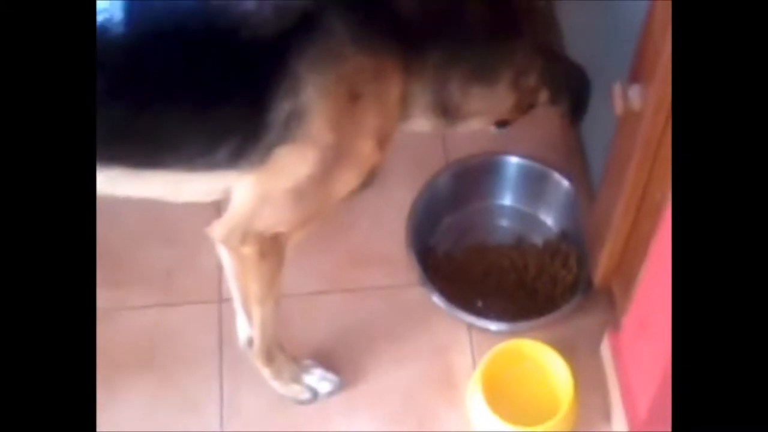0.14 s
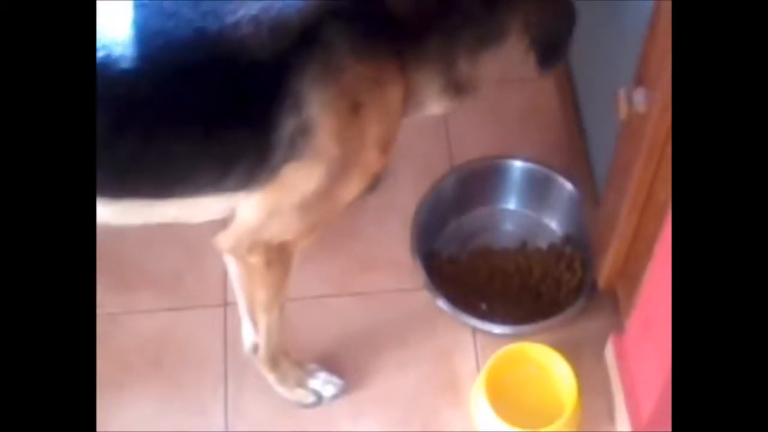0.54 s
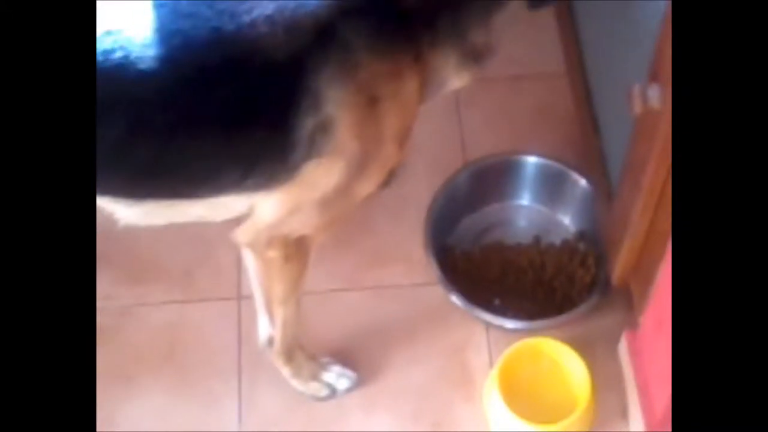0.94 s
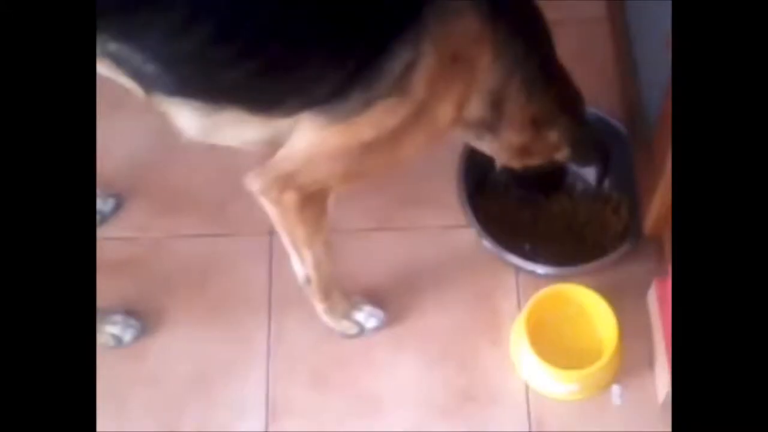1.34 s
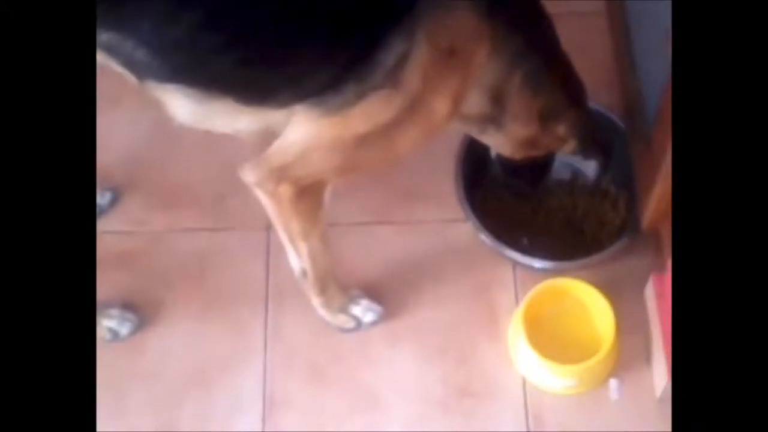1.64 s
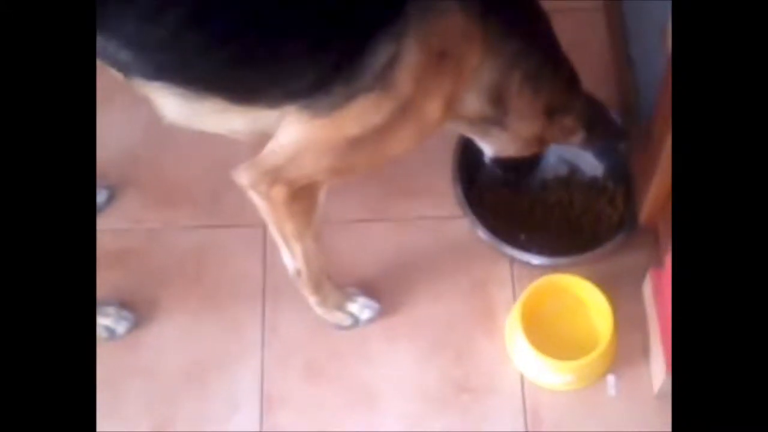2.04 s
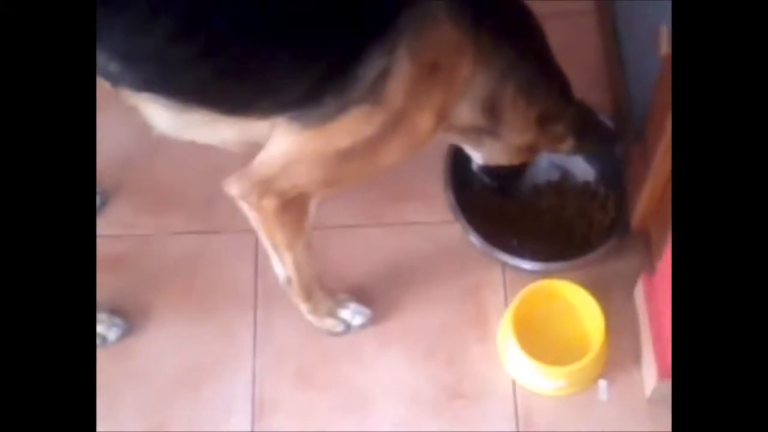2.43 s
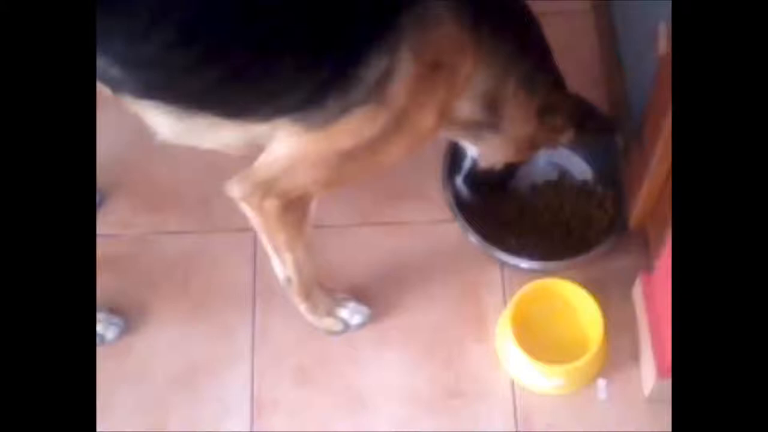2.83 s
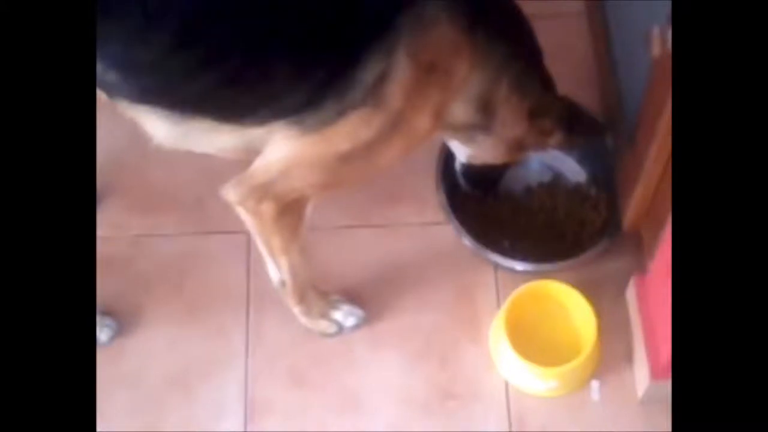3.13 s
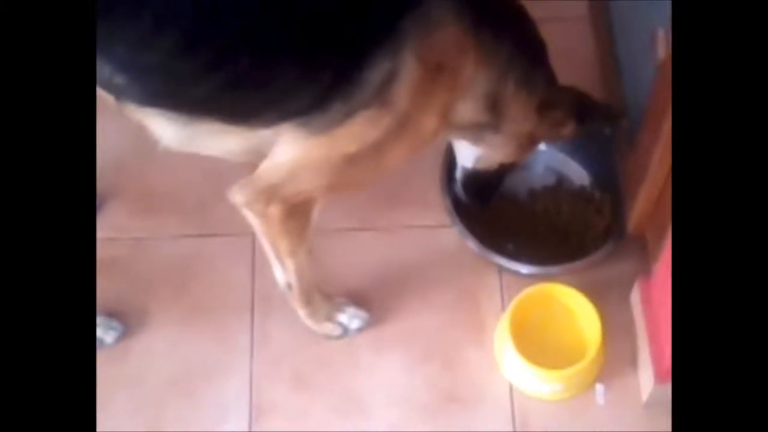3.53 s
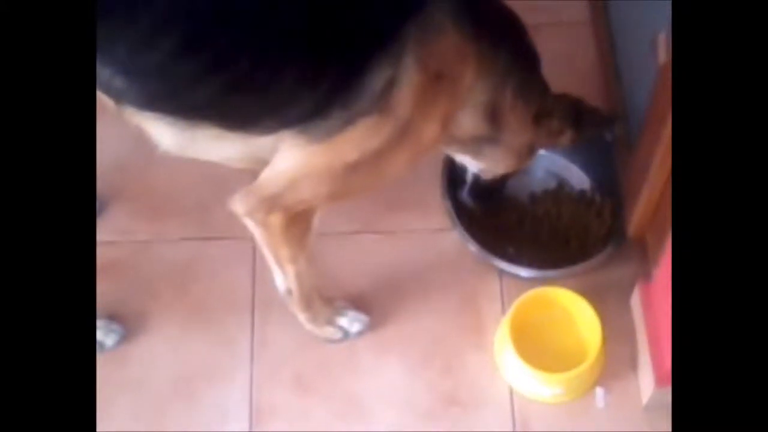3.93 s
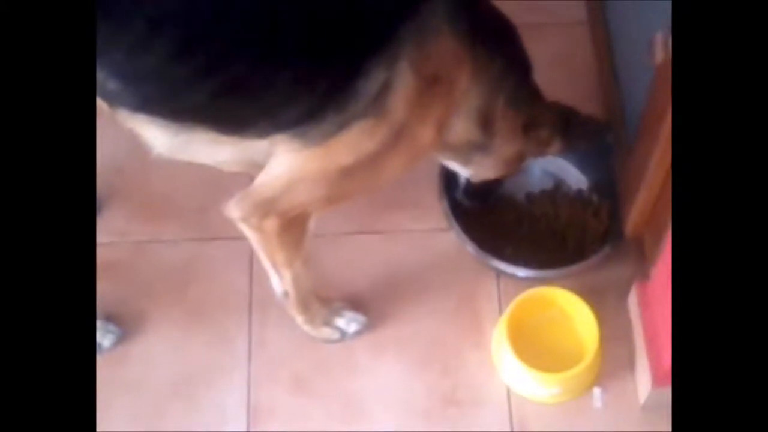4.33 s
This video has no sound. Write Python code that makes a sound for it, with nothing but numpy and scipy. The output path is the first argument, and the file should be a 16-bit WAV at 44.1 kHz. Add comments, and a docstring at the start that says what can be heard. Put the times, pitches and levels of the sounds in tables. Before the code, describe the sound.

Close-up mono sound of a dog chewing pellets: brittle cracks, hollow mouth pops, soft wet smacks and fine grinding in uneven bursts. About a third of the way through, the steel bowl gets one sharp, short knock that distorts the microphone. The heaviest crunching follows, then sparser bites. Hard tiles reflect everything over low, steady background noise.

```python
"""In a bare tiled kitchen a dog crunches dry kibble over a steel bowl.
Pellets crack between its teeth in uneven bursts, built from runs of tiny coloured fractures.
The mouth pops, squelches, thuds and rings low as gliding resonances; rubs and crumbs are coloured grains.
One hard clink on the bowl, a choked sine with a short broad clatter, overloads the small microphone.
A tail of sparse reflections rings after every bite, over a steady floor of coloured noise."""
import sys
import numpy as np
from scipy import signal
from scipy.fft import rfft, irfft, next_fast_len
from scipy.io import wavfile

SR = 44100
rng = np.random.default_rng(int(sys.argv[2]) if len(sys.argv) > 2 else 0)


def materialize(psi):
    """Save the field psi as 16-bit PCM at rate SR to the path in sys.argv[1].

    A 1-D psi becomes a single channel; in a 2-D psi each row is a channel.
    """
    bounded = np.clip(np.atleast_2d(psi).T, -1, 1)
    quanta = np.round(bounded * 32767).astype(np.int16)
    wavfile.write(sys.argv[1], SR, quanta)


N = 197171
TIME = np.arange(N) / SR


def from_db(db):
    """Turns decibels into an amplitude factor."""
    return 10 ** (np.asarray(db) / 20)


def rms_one(x):
    """Scales a sound to an RMS of 1."""
    return x / np.sqrt(np.mean(x ** 2) + 1e-20)


def at_hz(points, hz):
    """Reads a curve of (Hz, value) points along a logarithmic frequency axis."""
    known_hz, values = np.transpose(points)
    return np.interp(np.log(np.maximum(hz, 1)), np.log(known_hz), values)


def add(out, s, sound):
    """Lays a sound into the track at time s."""
    start = max(round(s * SR), 0)
    out[start:start + len(sound)] += sound[:N - start]


def colour(x, spectrum):
    """Minimum-phase filter with the given spectrum: nothing sounds early."""
    size = 2 * next_fast_len(len(x))
    hz = np.arange(size // 2 + 1) * SR / size
    # below its first point the spectrum rolls off towards the bass
    below = np.minimum(1, (hz + 10) / spectrum[0][0])
    cepstrum = irfft(np.log(from_db(at_hz(spectrum, hz)) * below))
    # folding the cepstrum forward in time gives the minimum phase
    cepstrum[1:size // 2] *= 2
    cepstrum[size // 2 + 1:] = 0
    response = np.exp(rfft(cepstrum))
    return irfft(rfft(x, size) * response)[:len(x)]


def grains(size, per_s, spread_db):
    """Tiny fractures at random moments, of random sign and very uneven strength."""
    strength = from_db(spread_db * np.minimum(rng.exponential(1, size), 4))
    happens = rng.random(size) < per_s / SR
    return happens * strength * rng.choice([-1, 1], size)


def ring(hz, t60):
    """A struck mode: a sine under an exponential decay that starts at 1."""
    t = TIME[:SR // 2]
    return np.sin(2 * np.pi * hz * t) * from_db(-60 * t / t60)


def swell(t, length_s):
    """Rises quickly to 1 and fades out over its length."""
    return np.sin(np.pi * np.clip(t / length_s, 0, 1) ** .6)


# Colour of the steady background. Each row: frequency in Hz, relative density in dB per Hz.
FLOOR_COLOUR = [(15, -54), (25, -6), (66, -27), (104, -55), (155, -22), (238, -11.5), (301, -15),
                (391, -11.5), (545, -13.5), (796, -13.5), (2050, -13.5), (2540, -11), (3890, -18),
                (7210, -24.5), (9370, -56.5), (15900, -120)]


def background(level_db):
    """Steady random noise takes on the colour of the background."""
    return from_db(level_db) * rms_one(colour(rng.standard_normal(N), FLOOR_COLOUR))


# How long the kitchen rings. Each row: frequency in Hz, time to fall by 60 dB in seconds.
KITCHEN_T60 = [(200, 0.63), (530, 0.56), (1400, 0.34), (3700, 0.4), (7000, 0.14)]
# How strongly the kitchen echoes. Each row: frequency in Hz, relative level in dB.
KITCHEN_ECHO = [(200, 0), (480, -1.1), (750, 1), (2000, -0.31), (4000, -1.3), (7000, -1.8)]


def kitchen(x, gap_s, early_db, early_s):
    """Reflections off the tiles follow a short gap; the lows of their tail last longest."""
    t = TIME[:SR]
    walls = rms_one(grains(SR, per_s=4200, spread_db=1.0)) * np.clip((t - gap_s) / 0.0012, 0, 1)
    walls = walls * (1 + from_db(early_db) * np.exp(-t / early_s))   # extra early energy
    spectrum, hz = rfft(walls), np.arange(SR // 2 + 1)
    edges = np.geomspace(100, 9000, 13)
    echo = np.zeros(SR)
    for low, high in zip(edges, edges[1:]):
        centre = np.sqrt(low * high)
        band = irfft(spectrum * ((hz >= low) & (hz < high)))
        fading = band * from_db(-60 * t / at_hz(KITCHEN_T60, centre))
        # a wider band carries more power
        width = np.sqrt(2 * (high - low)) / SR
        echo += from_db(at_hz(KITCHEN_ECHO, centre)) * rms_one(fading) * width
    return signal.fftconvolve(x, echo)[:N]


# Grinding between the cracks, following the work of the jaw.
# Each row: time in seconds, relative mouth level in dB, relative crumb level in dB.
GRINDING = [(0.0, -37.5, -42), (0.2, -58.5, -53.5), (0.38, -61.5, -48), (0.5, -71, -50), (0.87, -46.5, -46),
            (1.11, -50.5, -47.5), (1.31, -54, -49), (1.59, -52.5, -51), (2.02, -38.5, -38.5),
            (2.17, -42.5, -56), (2.33, -54, -46.5), (2.61, -48.5, -44), (2.8, -46.5, -51),
            (3.2, -55.5, -55), (3.63, -64, -55.5), (4.05, -54.5, -47.5), (4.28, -54.5, -38.5),
            (4.47, -52, -46.5)]
# Colour of the wet mouth. Each row: frequency in Hz, relative level in dB.
MOUTH_COLOUR = [(150, -23.5), (300, -15.5), (550, -3), (780, 4.5), (1200, 1.5), (2000, -9.5), (3200, -19.5)]
# Colour of the dry crumbs. Each row: frequency in Hz, relative level in dB.
CRUMB_COLOUR = [(1200, -6), (2400, 1.5), (3500, -8), (5000, -12), (6800, -5), (7600, -8.5)]


def grinding(mouth_db, crumbs_db):
    """Wet smacking and fine crumbs under the teeth follow the work of the jaw."""
    s, *columns = np.transpose(GRINDING)
    mouth, crumbs = [from_db(np.interp(TIME, s, column)) for column in columns]
    smacking = rms_one(colour(grains(N, per_s=410, spread_db=3.5), MOUTH_COLOUR))
    grit = rms_one(colour(grains(N, per_s=900, spread_db=5.0), CRUMB_COLOUR))
    return from_db(mouth_db) * mouth * smacking + from_db(crumbs_db) * crumbs * grit


# Soft rubs of tongue and muzzle over the pellets.
# Each row: start in seconds, length in seconds, level in dB.
SOFT_RUBS = [(0.84, 0.032, -52), (0.868, 0.032, -35), (1.147, 0.041, -35.5), (2.512, 0.037, -30.5),
             (3.829, 0.054, -38.5)]
# Colour of a rub. Each row: frequency in Hz, relative level in dB.
RUB_COLOUR = [(500, -14), (1000, -2), (1900, -0.5), (3300, -7), (4300, -4), (5300, -9), (6800, -3.5)]


def rubs():
    """Countless small slips merge into a short swish."""
    out, t = np.zeros(N), TIME[:SR // 8]
    for s, length_s, db in SOFT_RUBS:
        slips = rms_one(colour(grains(len(t), per_s=1800, spread_db=4), RUB_COLOUR))
        add(out, s, from_db(db) * swell(t, length_s) * slips)
    return out


# Squelches, thuds and low ringing in the hollow of the mouth.
# Each row: start in seconds, length in seconds, start pitch in Hz, end pitch in Hz, relative level in dB.
HOLLOW_SOUNDS = [(0.327, 0.13, 1240, 804, -50), (0.492, 0.037, 399, 356, -40.5),
                 (.96, 0.11, 478.3, 455, -49.5), (.99, 0.16, 228, 255, -55), (2.228, .047, 383, 391, -32.5),
                 (2.301, 0.12, 365.6, 426, -48.5), (2.429, .087, 1212, 1262, -48.5),
                 (2.502, 0.096, 1095, 686, -47.5), (2.835, 0.19, 859, 932, -49),
                 (2.844, 0.077, 424, 447, -49), (2.898, .2, 245.7, 252, -56.5)]
HOLLOW_BREADTH = 7.8   # width in Hz times length in s: a short sound is broad, a long one narrow


def mouth_hollow(level_db):
    """Noise stirs a cavity resonance that slides in pitch: squelches, thuds and low ringing."""
    out, t = np.zeros(N), TIME[:SR // 3]
    for s, length_s, start_hz, end_hz, db in HOLLOW_SOUNDS:
        half_width_hz = np.clip(HOLLOW_BREADTH / length_s / 2, 15, 300)
        narrow = signal.butter(2, half_width_hz, fs=SR, output="sos")
        # the first half of the noise only settles the filter
        stir = signal.sosfilt(narrow, rng.standard_normal((2, 2 * len(t))))[:, len(t):]
        pitch_hz = np.interp(t, [0, length_s], [start_hz, end_hz])
        phase = 2 * np.pi * np.cumsum(pitch_hz) / SR
        envelope = swell(t, length_s)
        sound = envelope * (stir[0] * np.cos(phase) + stir[1] * np.sin(phase))
        loudness = from_db(db + level_db) * np.sqrt(np.mean(envelope ** 2))
        add(out, s, loudness * rms_one(sound))
    return signal.sosfilt(signal.butter(2, 170, "high", fs=SR, output="sos"), out + 1e-18)


CLINK_S = 1.5282   # moment of the knock on the steel
# The bowl's faint ring. Each row: pitch in Hz, relative level in dB, time to fall by 60 dB in seconds.
BOWL_RING = [(2090, -46.5, 0.24), (2290, -31.5, 0.3), (2310, -43, .28), (4940, -52.5, 0.24),
             (6900, -40.5, .24)]
# Colour of the knock's clatter. Each row: frequency in Hz, relative level in dB.
CLATTER_COLOUR = [(400, -5), (800, 1.5), (2200, 4), (4000, -4), (6000, 2.5), (6900, 6)]


def bowl(clatter_db, clatter_s, ring_db):
    """A short broad clatter as the steel is struck, and the bowl's faint ring."""
    out, t = np.zeros(N), TIME[:SR // 10]
    add(out, CLINK_S, sum(from_db(db + ring_db) * ring(hz, t60) for hz, db, t60 in BOWL_RING))
    clatter = rms_one(colour(grains(len(t), per_s=8400, spread_db=2), CLATTER_COLOUR))
    add(out, CLINK_S, from_db(clatter_db) * clatter * np.exp(-t / clatter_s))
    return out


def clink(pitch_hz, length_s, peak_db, touch_db, touch_hz, octave):
    """A light touch, then a hard knock on the steel that the muzzle chokes within a few milliseconds."""
    out, t = np.zeros(N), TIME[:SR // 20]
    attack = 1 - np.exp(-t / 0.0013)
    choke = attack * np.clip(1 - t / length_s, 0, 1)
    # the pitch climbs during the first cycles, as the contact stiffens
    climbing_hz = pitch_hz * (1 - 0.2 * np.exp(-t / 0.00071))
    knock = choke * np.sin(2 * np.pi * np.cumsum(climbing_hz) / SR)
    add(out, CLINK_S - .0013, from_db(touch_db) * ring(touch_hz, 0.066))
    # a one-sided contact swings unevenly, which adds the octave
    add(out, CLINK_S, from_db(peak_db) * (knock - octave * knock ** 2))
    return out


# Dry ticks right beside the microphone. Each row: start in seconds, relative level in dB.
DRY_TICKS = [(0.036, -11), (1.0129, -17)]


def ticks(snap_hz, after_hz):
    """A snap of a few cycles with a thin after-ring, too small to carry any bass."""
    out = np.zeros(N)
    tick = 2.1 * ring(snap_hz, 0.0014) + 0.13 * ring(after_hz, 0.0098)
    for s, db in DRY_TICKS:
        add(out, s, from_db(db) * tick)
    return signal.sosfilt(signal.butter(2, 1500, "high", fs=SR, output="sos"), out + 1e-18)


# Short pops of lips and tongue. Each row: start in seconds, pitch in Hz, relative peak in dB.
MOUTH_POPS = [(.059, 871, -20), (.471, 836, -19), (.5, 1635, -10.5), (.513, 875, -11), (.518, 1765, -7.5),
              (.548, 976, -17), (2.093, 717, -12.5), (2.141, 1535, -23), (2.191, 1232, -20),
              (2.627, 1977, -29.5), (2.695, 726, -21), (2.7, 1240, -28), (2.701, 1727, -13.5),
              (2.849, 754, -33.5)]
POP_CYCLES = 4.5   # every pop decays by a factor e over this many cycles


def pops(rise_s, glide, level_db):
    """The mouth cavity rings for a moment, its pitch lifting as the lips part."""
    out, t = np.zeros(N), TIME[:SR // 4]
    for s, hz, peak_db in MOUTH_POPS:
        fading = np.exp(-t * hz / POP_CYCLES)
        lifting_hz = hz * (1 + glide * (.5 - fading))
        phase = 2 * np.pi * np.cumsum(lifting_hz) / SR
        envelope = (1 - np.exp(-t / rise_s)) * fading
        add(out, s, from_db(peak_db + level_db) * envelope / envelope.max() * np.sin(phase))
    return out


def fragments(rows, delay_s, loss_db):
    """A cracked pellet gives way once more, weaker and at an uneven delay, as the jaw closes on it."""
    lateness = rng.uniform(-1, 1, len(rows))   # in octaves of the delay
    return [(s + delay_s * 2 ** late, strength_db - loss_db, hollow_db)
            for (s, strength_db, hollow_db), late in zip(rows, lateness)]


# Pellets cracking between the teeth. Each row: start in seconds, relative strength in dB, hollowness in dB
# (high deep in the closed mouth, low at the front teeth).
PELLET_CRACKS = [(0.059, -43, 5.5), (0.275, -55, -32), (.337, -48.5, -3.5), (0.4696, -35.5, 3.5),
                 (.494, -32, 7), (.513, -28, 3), (0.5477, -33, 1.5), (.651, -48, -20), (0.843, -46.5, -27),
                 (1.0, -48, -6), (1.007, -38.5, 3.5), (1.2256, -31, 4.5), (1.3, -43.5, -7),
                 (1.458, -43, -15), (1.7636, -30, -3), (1.8414, -34.5, 3.5), (1.853, -36.5, -23),
                 (1.984, -40.5, 0), (2.039, -44.5, 9.5), (2.058, -44, 3), (2.0895, -23.5, 1),
                 (2.1065, -32, 6.5), (2.1385, -28, 6), (2.187, -44, 14.5), (2.234, -26.5, 2.5),
                 (2.612, -53, -13), (2.6552, -35, 3), (2.688, -37.5, 12.5), (2.6942, -28, 11.5),
                 (2.85, -55, 17.5), (3.059, -49, -4), (3.112, -53.5, -5), (3.657, -44.5, -0.5),
                 (3.707, -48, -3.5), (3.921, -27, -13), (3.9519, -36.5, -27.5), (4.193, -48, -1),
                 (4.238, -40, -6.5), (4.279, -34, -8.5), (4.307, -34, -4.5), (4.42, -46, 1.5)]
# The jaw's part of a crack. Each row: frequency in Hz, relative level in dB.
JAW_COLOUR = [(100, -46), (300, -15.5), (520, -9.5), (740, 5), (950, -3.5), (1200, -1.5), (1700, -18.5),
              (3000, -29)]
# The pellet body's part of a crack. Each row: frequency in Hz, relative level in dB.
BODY_COLOUR = [(700, -22.5), (1250, -7), (1900, 2), (3100, -1.5), (4200, -7.5), (6500, -31.5)]
# The brittle edge's part of a crack. Each row: frequency in Hz, relative level in dB.
EDGE_COLOUR = [(2200, -20), (3700, -6.5), (5200, 3), (6800, 3), (7600, -4)]
MUFFLING = 0.23   # a closed mouth dulls the brittle edge: dB per dB of hollowness
# a crack stronger than the usual one splits the whole pellet: more body, less edge (dB per dB of strength)
USUAL_CRACK_DB, SPLITTING = -33.5, 0.1


def cracks(rows, decay_s, crumble_db, crumble_s, jaw_db, pellet_db, edge_db):
    """A pellet breaks in a quick run of fractures, then crumbles; jaw, body and edge each colour it."""
    out, t = np.zeros(N), TIME[:SR // 20]
    attack = 1 - np.exp(-t / 0.0003)
    envelope = attack * (np.exp(-t / decay_s) + from_db(crumble_db) * np.exp(-t / crumble_s))
    for s, strength_db, hollow_db in rows:
        split_db = SPLITTING * (strength_db - USUAL_CRACK_DB)
        parts = ((JAW_COLOUR, jaw_db + hollow_db),
                 (BODY_COLOUR, pellet_db + split_db),
                 (EDGE_COLOUR, edge_db - split_db - MUFFLING * hollow_db))
        for part_colour, part_db in parts:
            burst = colour(grains(len(t), per_s=9000, spread_db=2.5) * envelope, part_colour)
            # a level counts the burst's energy as spread over 5 ms
            power = np.sum(burst ** 2) / (.005 * SR)
            add(out, s, from_db(strength_db + part_db) * burst / np.sqrt(power + 1e-20))
    return out


# how strongly each source stirs the room (dB)
CRACKS_ROOM_DB, POPS_ROOM_DB, CHEWING_ROOM_DB, CLOSE_ROOM_DB = -1.5, -4, -1, -22.5


def scene():
    """The dog bites, smacks and grinds at the bowl; the tiles answer, over a steady background."""
    floor = background(level_db=-56)
    chewing = grinding(mouth_db=-5.5, crumbs_db=-4.5) + rubs() + mouth_hollow(level_db=-2.0)
    steel = bowl(clatter_db=-12, clatter_s=0.01, ring_db=-3.5)
    knock = clink(pitch_hz=2199, length_s=0.0083, peak_db=8.5, touch_db=-25.5, touch_hz=7160, octave=0.032)
    close = knock + ticks(snap_hz=4600, after_hz=6500)
    smacks = pops(rise_s=0.00067, glide=0.063, level_db=-6.0)
    rows = list(PELLET_CRACKS) + fragments(PELLET_CRACKS, delay_s=.016, loss_db=17)
    bites = cracks(rows, decay_s=0.0033, crumble_db=-31.0, crumble_s=.008,
                   jaw_db=-1.5, pellet_db=2.5, edge_db=3.5)
    spreading = (from_db(CRACKS_ROOM_DB) * bites + from_db(POPS_ROOM_DB) * smacks
                 + from_db(CHEWING_ROOM_DB) * (chewing + steel) + from_db(CLOSE_ROOM_DB) * close)
    room = kitchen(spreading, gap_s=0.0036, early_db=3.5, early_s=0.13)
    return (bites + smacks + chewing + steel + close + room + floor)[None]


MIC_TOP_HZ, CUTOFF_HZ = 7200, 16000   # the microphone's upper limit, and the final cut


def record(dry):
    """The microphone rings just under its upper limit; a loud peak clips lopsidedly; the top is cut."""
    peaked = dry + 0.31 * signal.lfilter(*signal.iirpeak(6850, 14, fs=SR), dry)
    narrow = signal.sosfilt(signal.ellip(8, .5, 60, MIC_TOP_HZ, fs=SR, output="sos"), peaked)
    ceiling = np.where(narrow > 0, .96, 1.04)
    clipped = narrow / (1 + np.abs(narrow / ceiling) ** 8) ** (1 / 8)
    return signal.sosfilt(signal.cheby2(12, 70, CUTOFF_HZ, fs=SR, output="sos"), clipped)


dry = scene()
out = record(dry)
materialize(out)
```